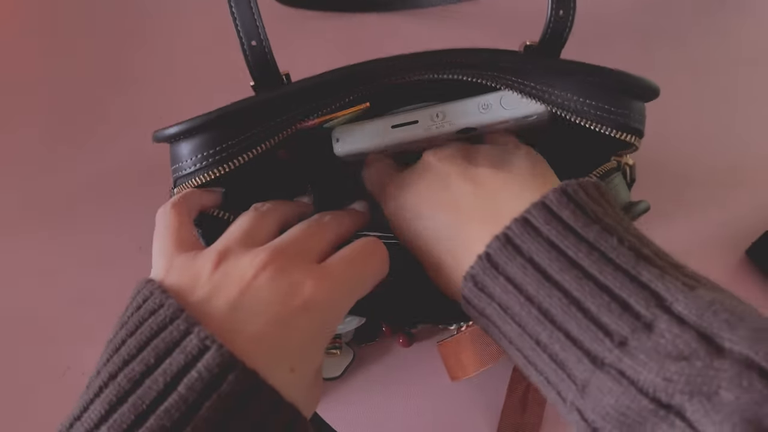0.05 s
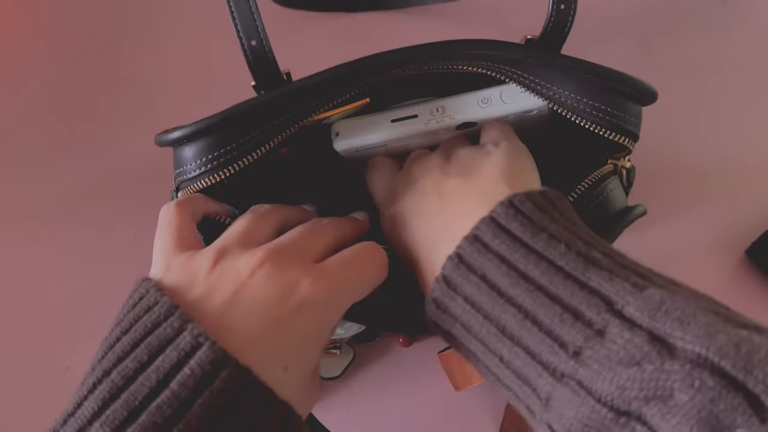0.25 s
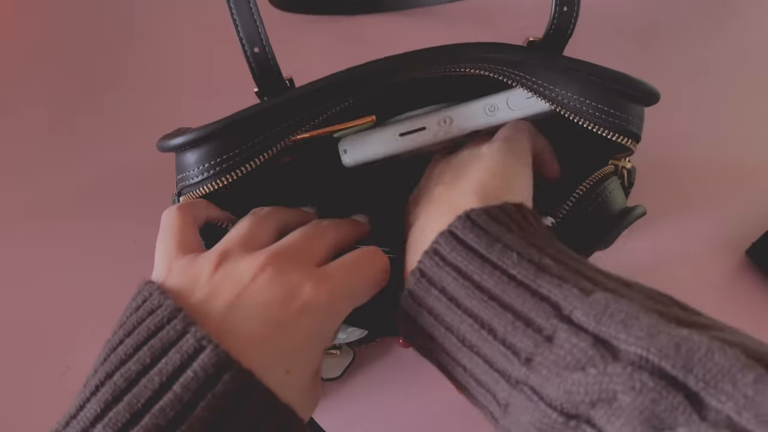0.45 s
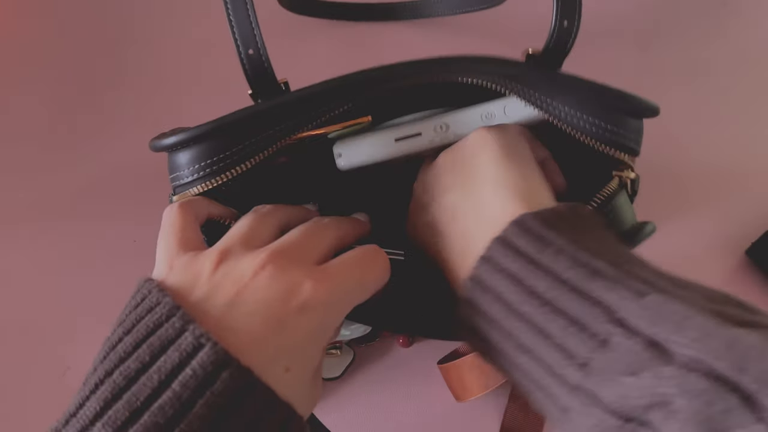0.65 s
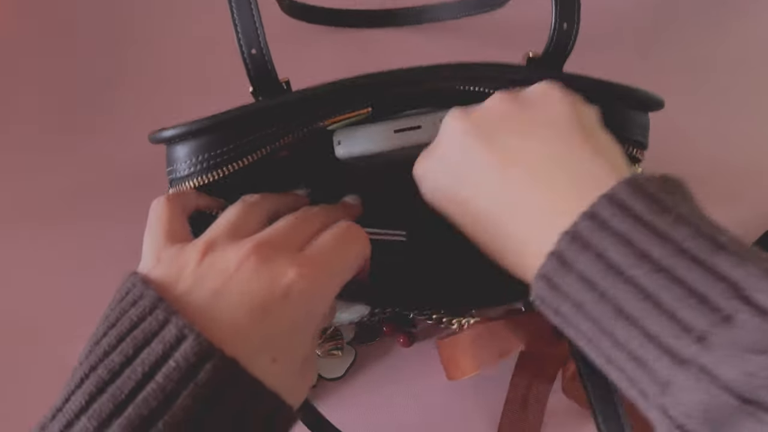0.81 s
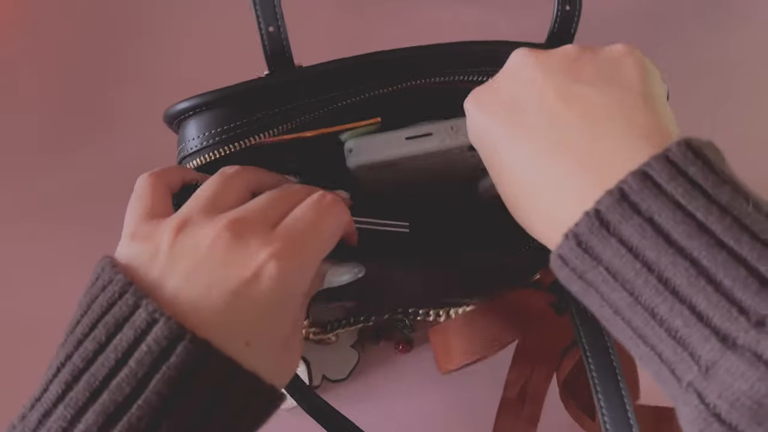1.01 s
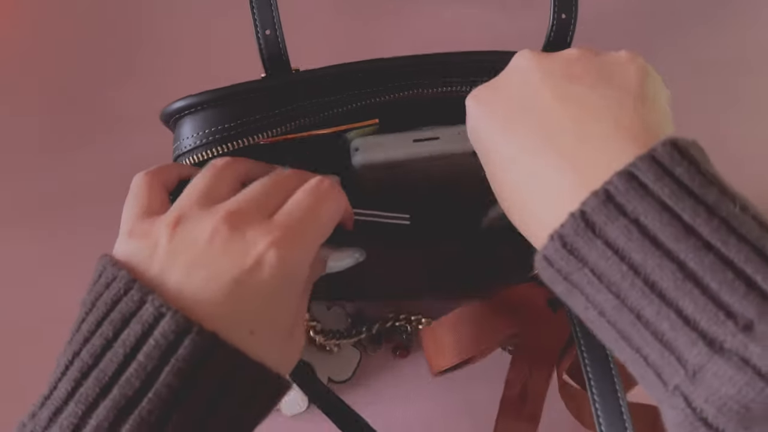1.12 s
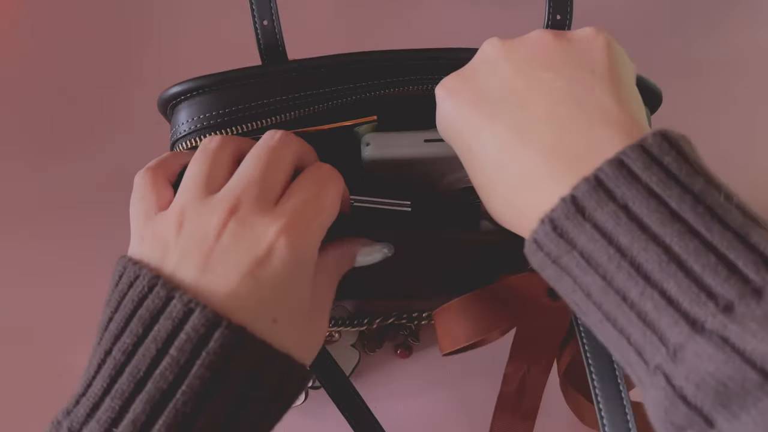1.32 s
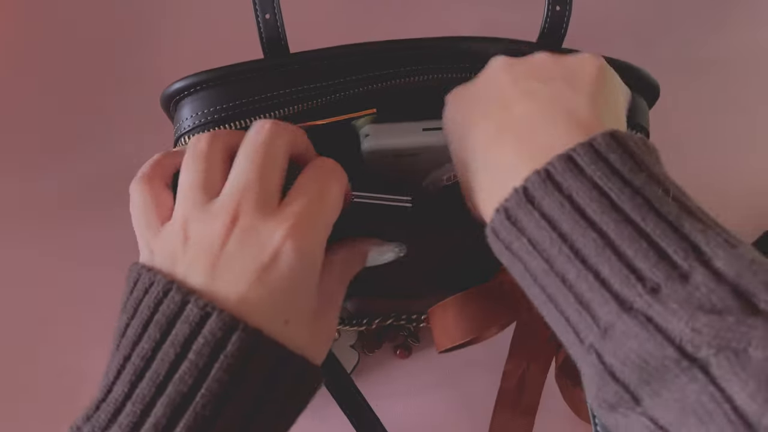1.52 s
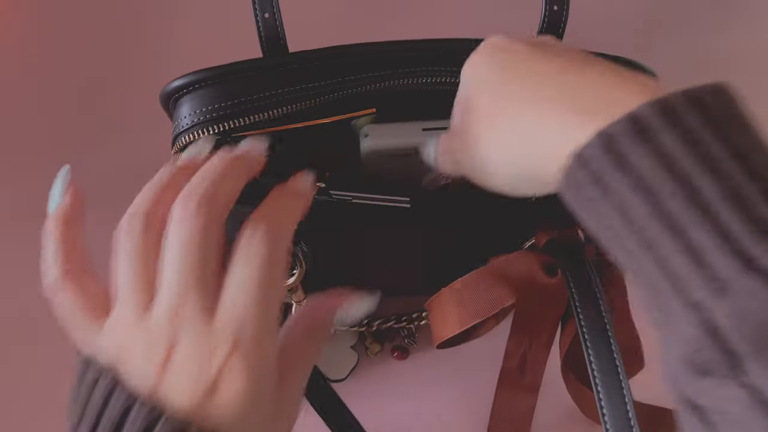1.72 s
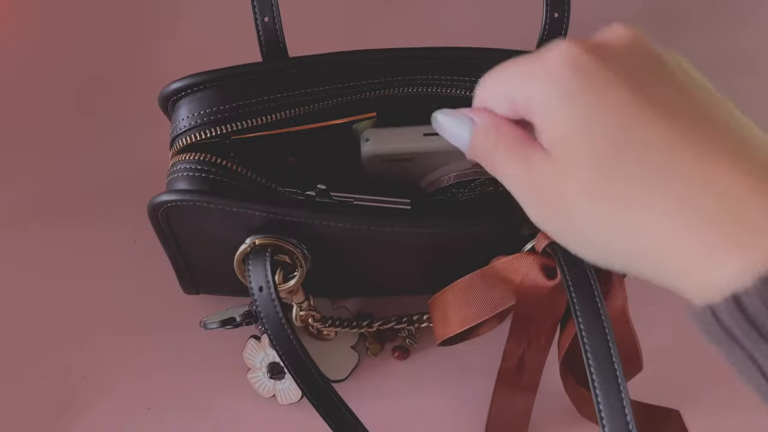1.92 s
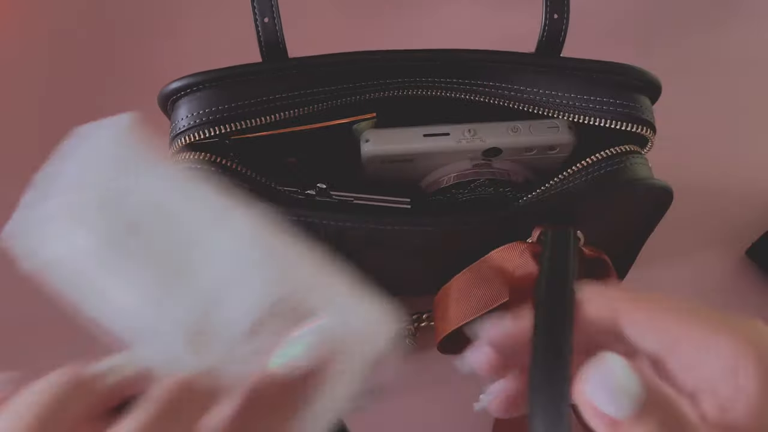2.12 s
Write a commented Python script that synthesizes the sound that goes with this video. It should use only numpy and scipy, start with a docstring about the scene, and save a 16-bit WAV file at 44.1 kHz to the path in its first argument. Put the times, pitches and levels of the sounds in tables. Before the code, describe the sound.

Leather handbag rustling and creaking as a small plastic camera knocks its way inside.

```python
"""A small plastic camera is pushed into a leather handbag, close to two microphones in a quiet, humming room.
First a knitted sleeve brushes the opening and the leather creaks in short slips; nails and zip teeth tick.
The camera's shell gives a sharp knock at 0.6 s, then scuffs and squeaks past the lining; the zip tinkles.
Just after 1 s it lands with a deep thump, slides along the leather and knocks as it settles.
The rustle dies away, leaving a faint jingle and one last tap over the hum."""
import sys
import numpy as np
from scipy import signal
from scipy.fft import rfft, irfft, next_fast_len
from scipy.io import wavfile

SR = 44100
rng = np.random.default_rng(int(sys.argv[2]) if len(sys.argv) > 2 else 0)


def materialize(psi):
    """Save the field psi as 16-bit PCM at rate SR to the path in sys.argv[1].

    A 1-D psi becomes a single channel; in a 2-D psi each row is a channel.
    """
    bounded = np.clip(np.atleast_2d(psi).T, -1, 1)
    quanta = np.round(bounded * 32767).astype(np.int16)
    wavfile.write(sys.argv[1], SR, quanta)


N = 94815

# EQ curves for the rumble, wool, leather, lining, ticks and reverb send.
# Each row: frequency in Hz, relative gain in dB.
ROOM_EQ = [(20, -19.5), (36, -21.5), (54, 5), (80, -2.5), (130, 4), (175, -7), (260, -15), (400, -20),
           (600, -30), (1000, -36.5), (2000, -50), (4000, -53), (8000, -55.5), (15000, -51)]
WOOL_EQ = [(300, 8.5), (1200, 5), (2800, 5.5), (4500, -1), (6500, 2.5), (9500, 1.5), (12000, 5), (15500, 5)]
LEATHER_EQ = [(100, -18.5), (250, -1), (420, 6), (570, -3.5), (790, -1), (1000, -5), (1280, -9),
              (1650, -12), (2700, -16), (4500, -24.5), (12000, -45.5)]
SCUFF_EQ = [(150, -30), (400, -16), (750, 3.5), (1350, 7.5), (1650, -6), (2300, 0), (2900, -11),
            (3600, -6.5), (5000, -16.5), (9500, -18), (12000, -15), (16000, -20)]
TICK_EQ = [(200, -14), (800, 9), (1800, -5), (3500, -1), (6000, 0.5), (9200, -5.5), (11500, 10), (14000, 5),
           (16500, 1.5)]
REVERB_EQ = [(60, -22.5), (160, -8), (350, 4.5), (800, 4.5), (1300, -0.5), (1800, -1), (4000, 7.5),
             (9000, 1.5), (12000, -15), (15000, -24)]
# The room's hum. Each row: pitch in Hz, level in dB.
HUM = [(59.2, -61.5), (121, -53.5)]
# Fader rides for the brushing sleeve and the rubbed leather. Each row: time in seconds, level in dB.
WOOL_FADER = [(0, -54.5), (.13, -60.5), (.18, -54.5), (.23, -55.5), (.29, -64), (.33, -66), (.36, -51.5),
              (.42, -68), (.5, -70.5), (.56, -55.5), (.62, -51), (.7, -54.5), (.79, -53), (.89, -46.5),
              (.97, -62.5), (1.07, -56.5), (1.14, -56), (1.21, -57), (1.36, -56.5), (1.41, -59), (1.5, -55),
              (1.61, -53.5), (1.65, -55), (1.7, -59), (1.75, -56), (1.81, -76), (2.03, -91.5), (2.05, -71),
              (2.12, -76)]
LEATHER_FADER = [(0, -53.5), (.09, -47.5), (.13, -54.5), (.19, -44.5), (.26, -59), (.33, -56),
                 (.365, -41.5), (.42, -59.5), (.51, -55), (.57, -52), (.625, -43), (.68, -47), (.715, -53),
                 (.75, -49.5), (.79, -58), (.87, -40.5), (.92, -47.5), (.98, -50.5), (1.05, -54.5),
                 (1.14, -46.5), (1.22, -57.5), (1.34, -47.5), (1.41, -60), (1.48, -49), (1.53, -59),
                 (1.62, -59), (1.66, -53.5), (1.76, -57), (1.87, -61.5), (2.12, -80)]
# The shell slides on leather. Each row: start, peak and end in seconds, level in dB, width factor,
# then the low, middle and high resonance in Hz, halfway through the slide.
SLIDES = [(1.224, 1.317, 1.39, -45.5, 0.93, 441.7, 1229, 2566),
          (1.633, 1.636, 1.73, -45.5, 1.9, 770, 1330, 2675)]
# Those three resonances. Each row: gain in dB, base half width in Hz.
SLIDE_RESONANCES = [(-1, 43), (-5.5, 245), (-15, 630)]
# Zip pull and chain. Each row: start in seconds, level in dB, pitch in Hz, t60 in seconds,
# rattle as phase wander in radians.
TINKLES = [(.944, -37, 14100, .075, .9), (.996, -52.5, 5470, 0.038, 1.2), (1.248, -41, 14200, 0.081, .8),
           (2.044, -50, 9300, 0.074, 2.6)]
# Nails and zip teeth. Each row: start in seconds, level in dB, gain of the very top in dB.
TICKS = [(.2080, -22, 10), (0.2097, -25, -10), (0.5776, -29, -9), (0.588, -27, -5), (0.7284, -27.5, -11),
         (0.757, -28, -7), (0.8181, -27.5, -6), (0.898, -30.5, -7), (1.138, -33.5, -3),
         (1.1693, -23.5, -13), (1.369, -37.5, 13.5), (1.703, -38, 2), (1.749, -39, 3), (2.044, -48, 3),
         (2.139, -44, -5)]
# Leather slips. Each row: start in seconds, level in dB, low, middle and high trim in dB, length factor.
CREAKS = [(.0827, -33.5, -16, -2.5, -21, 0.27), (0.0876, -33, -15, -2.5, -22, 0.52),
          (0.0958, -32, -7, -5.5, -28, 0.43), (0.1056, -25, -8, -4, -27, 0.26),
          (.152, -39, -5.5, -4.5, -16, .5), (.174, -31.5, -5, -8.5, -20, 0.84),
          (0.184, -38.5, -23, -4, -16, 0.97), (0.3231, -45.5, 5.5, -21, -25, 0.57),
          (.349, -32, -3, -13.5, -22, 1), (.356, -39, -4, -13, -20, 0.89), (.5965, -33.5, -6, -9, -24, .8),
          (.614, -29, -6, -11, -21, 2.2), (0.659, -31, 1.5, -14, -23, 1.4),
          (.669, -29.5, -3.5, -9.5, -27, 1.4), (.7, -37, -11, -7.5, -12, 1),
          (.913, -32.5, -5, -11, -19.5, 1.4), (1.124, -33.5, -6, -2.5, -20, 0.78),
          (1.133, -37, -0.5, -6, -11.5, 1.1), (1.227, -35, -3.5, -11, -23, 0.76),
          (1.456, -38.5, -6.5, -12, -22, .7), (1.635, -33, -1.5, -12, -26, 1.1),
          (1.643, -33.5, -6.5, -9, -19.5, 0.81), (1.651, -36.5, -15, -6.5, -16, 1.2),
          (1.704, -41, -15, -5, -13, 1.2), (1.72, -36.5, -5, -9.5, -11.5, 1.06),
          (1.835, -47.5, -4, -7.5, -24.5, 1.4)]
# The leather's resonances. Each row: lower and upper edge in Hz, gain in dB, base decay in seconds.
CREAK_BANDS = [(770, 1760, -1, 0.0029), (2090, 3430, 5, 0.0019), (4300, 11500, 6.5, 0.0027)]
# Plastic on lining. Each row: start and length in seconds, first and last pitch in Hz, level in dB.
SQUEAKS = [(.836, 0.0275, 1150, 1390, -24.5), (.824, 0.024, 680, 800, -29),
           (.822, 0.016, 2420, 2300, -37.5), (.828, 0.016, 2150, 1400, -40.5), (.848, 0.027, 322, 360, -28),
           (.878, 0.029, 350, 428, -39), (.902, 0.048, 430, 530, -40)]
# Bumps on the bag's wall. Each row: start in seconds, level in dB, pitch in Hz.
WALL_BUMPS = [(.352, -30.5, 436), (.376, -30, 315), (.595, -25.5, 445), (.606, -39, 400), (0.62, -28, 300),
              (.637, -29, 250), (0.656, -31, 380), (1.009, -30, 296), (1.082, -21.5, 271),
              (1.132, -23, 462), (1.155, -33.5, 397), (1.180, -38, 399.4), (1.560, -29, 322),
              (1.5605, -35.5, 520), (.802, -35, 397), (1.782, -36, 327), (2.141, -33, 390)]
# The bag meets the table. Each row: start in seconds, level in dB, contact hardness as a cutoff in Hz.
THUMPS = [(0.377, -25.5, 60.3), (1.083, -11, 262), (1.148, -19.5, 200), (1.528, -24.5, 69.6),
          (1.827, -32, 91)]
# The whole bag's modes. Each row: pitch in Hz, gain in dB, t60 and rise in seconds.
BAG_MODES = [(70, -3, 0.23, 0.018), (122.8, 1, .14, 0.0063), (187.5, -14, 0.16, 0.014),
             (275, -15.5, .15, 0.0045)]
# Hits on the camera. Each row: start in seconds, level in dB, hardness as a cutoff in Hz, pitch factor.
KNOCKS = [(.088, -25.5, 600, 1.16), (.152, -27, 650, 0.89), (.2092, -26.5, 1400, 1.05),
          (.536, -34.5, 1200, 1.15), (0.5594, -26.5, 900, 1.02), (.5893, -9.5, 560, 0.96),
          (.600, -28, 650, 0.92), (.801, -34, 1000, 1.16), (1.078, -18, 704, 0.96),
          (1.1701, -20, 3160, 1.042), (1.557, -29, 700, 1.11), (1.781, -40, 900, 1.22),
          (2.1395, -26.5, 1080, 1.06)]
# Its plastic shell's modes. Each row: base pitch in Hz, gain in dB, t60 in seconds.
SHELL_MODES = [(748, -5, 0.027), (945, -6.5, 0.013), (1270, -0.5, 0.0076), (1514, -35, 0.015),
               (1950, -17, 0.028), (2620, -12.5, 0.019), (3350, -5, 0.0092), (4270, -21, 0.01)]
# Phase between the microphone ports. Each row: frequency in Hz, lead of the left side in radians.
PORT_PHASE = [(0, 0), (4500, .1), (6000, -.2), (8000, -1.5), (9500, -2.1), (11200, -3.0), (13000, -3.2),
              (15000, -4.1), (17000, -3.7)]


def amp(db):
    """Decibels to gain."""
    return 10 ** (np.asarray(db) / 20)


def unit_rms(x):
    """Scale to unit rms."""
    return x / np.sqrt(np.mean(x ** 2) + 1e-20)


def since(start):
    """Seconds since a moment, zero before it."""
    return np.maximum(np.arange(N) / SR - start, 0)


def fader(points):
    """Gain over time through (seconds, dB) points."""
    return amp(np.interp(since(0), *np.transpose(points)))


def drift(rate_hz):
    """Smooth random wobble of unit rms."""
    pole = np.exp(-2 * np.pi * rate_hz / SR)
    return unit_rms(signal.lfilter([1], [1, -2 * pole, pole * pole], rng.standard_normal(N + SR))[SR:])


def filtered(x, hz, kind):
    """Gentle low-, high- or band-pass."""
    return signal.sosfilt(signal.butter(2, hz, kind, fs=SR, output="sos"), x)


def eq(x, curve, keep_power=True):
    """Minimum-phase EQ; with keep_power, white noise comes out equally strong."""
    size = next_fast_len(2 * N)
    hz, db = np.transpose(curve)
    gain = amp(np.interp(np.log(np.arange(size // 2 + 1) * SR / size + 1), np.log(hz), db))
    cepstrum = irfft(np.log(unit_rms(gain) if keep_power else gain), size)
    cepstrum[1:size // 2] *= 2   # folded forward, so nothing rings ahead of a hit
    cepstrum[size // 2 + 1:] = 0
    return irfft(rfft(x, size) * np.exp(rfft(cepstrum)), size)[..., :N]


def burst(start, decay, rise=0.00029):
    """Fast attack, exponential decay."""
    t = since(start)
    return (1 - np.exp(-t / rise)) * np.exp(-t / decay)


def ring(start, hz, t60, rise=0.00022):
    """One struck resonance."""
    return burst(start, t60 / np.log(1000), rise) * np.sin(2 * np.pi * hz * since(start))


def softened(hz, hardness_hz):
    """A soft contact hardly drives the higher modes."""
    return 1 / np.sqrt(1 + (hz / hardness_hz) ** 4)


def friction(rough_db, grains_per_s, grain_share):
    """Fine hiss and separate catches under an unsteady pressure."""
    grains = (rng.random(N) < grains_per_s / SR) * rng.standard_normal(N)
    texture = np.sqrt(1 - grain_share) * rng.standard_normal(N) + np.sqrt(grain_share) * unit_rms(grains)
    return unit_rms(texture * amp(rough_db * drift(75)))


def room_tone():
    """The bed: low rumble with a wavering hum."""
    rumble = amp(-44) * eq(rng.standard_normal(N), ROOM_EQ)
    hum = sum(amp(db) * np.sqrt(2) * np.sin(2 * np.pi * hz * since(0) + 1.04 * drift(6.1))
              for hz, db in HUM)
    return rumble + hum


def rustle():
    """Wool hisses on the opening while camera and fingers rub a darker tone from the leather."""
    wool = friction(rough_db=2, grains_per_s=450, grain_share=0.27) * fader(WOOL_FADER)
    leather = friction(rough_db=3, grains_per_s=700, grain_share=0.3) * fader(LEATHER_FADER)
    return eq(wool, WOOL_EQ) + eq(leather, LEATHER_EQ)


def shell_slides():
    """Fine friction sings in three hollow resonances that sink as the camera goes deeper."""
    t, out = since(0), 0
    sag_octaves_per_s = 1.5
    for start, peak, end, db, width, *pitches in SLIDES:
        pressure = np.sqrt(np.interp(t, [start, peak, end], [0, 1, 0]))
        sag = 2 ** (-sag_octaves_per_s * (np.clip(t, start, end) - (start + end) / 2))
        for hz, (gain_db, width_hz) in zip(pitches, SLIDE_RESONANCES):
            phase = 2 * np.pi * np.cumsum(hz * sag) / SR
            band = drift(width * width_hz) * np.cos(phase) + drift(width * width_hz) * np.sin(phase)
            out += amp(db + gain_db) * pressure * band
    return out


def zip_tinkles():
    """Tiny metal parts ring: a thin ping when free, a rough jingle when they rattle."""
    out = 0
    for start, db, hz, t60, rattle in TINKLES:
        tone = np.sin(2 * np.pi * hz * since(start) + rattle * drift(320))
        out += amp(db) * burst(start, t60 / np.log(1000)) * tone
    return out


def nail_and_zip_ticks():
    """Hard, bright ticks with a faint tail; the sharpest contacts have the most top."""
    noise = rng.choice([-1, 1], N)
    body, top, crossover_hz = 0, 0, 11800
    for start, db, top_db in TICKS:
        tick = amp(db) * noise * (burst(start, decay=0.0013) + amp(-39) * burst(start, decay=0.0086))
        body += tick
        top += amp(top_db) * tick
    return eq(filtered(body, crossover_hz, "low") - filtered(top, crossover_hz, "high"), TICK_EQ)


def leather_creaks():
    """Each slip is a short tick or a longer crackle in three broad resonances."""
    out = 0
    for band, (low, high, gain_db, decay) in enumerate(CREAK_BANDS):
        force = sum(amp(db + trims[band] + gain_db) * burst(start, decay * length, rise=0.0007 * length)
                    for start, db, *trims, length in CREAKS)
        makeup_gain = np.sqrt(SR / 2 / (high - low))
        out += makeup_gain * filtered(force * rng.choice([-1, 1], N), [low, high], "band")
    return out


def lining_scuff():
    """Plastic drags on the lining in one quick swell of rough friction."""
    t = since(0)
    start, peak, end = 0.825, 0.853, 0.869
    swell = fader([(start, -35.5), (peak, -29), (end, -35.5)]) * (t > start) * (t < end)
    return eq(friction(rough_db=1, grains_per_s=3000, grain_share=0.5) * swell, SCUFF_EQ)


def lining_squeaks():
    """Plastic squeaks past the lining in short, jittery glides, most of them upward."""
    out = 0
    for start, length, first_hz, last_hz, db in SQUEAKS:
        progress = np.minimum(since(start) / length, 1)
        glide = first_hz + (last_hz - first_hz) * np.sin(np.pi / 2 * progress)
        hz = glide * (1 + 0.025 * drift(194))
        out += amp(db) * np.sin(np.pi * progress) * np.sin(2 * np.pi * np.cumsum(hz) / SR)
    return out


def bag_thumps():
    """Dull bumps of the wall and deep thumps of the whole bag on the table."""
    bumps = sum(amp(db) * ring(start, hz, t60=0.029, rise=0.00069) for start, db, hz in WALL_BUMPS)
    thumps = sum(amp(db + mode_db) * softened(hz, hardness) * ring(start, hz, t60, rise)
                 for start, db, hardness in THUMPS for hz, mode_db, t60, rise in BAG_MODES)
    return bumps + thumps


def camera_knocks():
    """The plastic shell rings briefly, damped by the hand; its modes alternate in polarity."""
    return sum((-1) ** k * amp(db + mode_db) * softened(hz, hardness) * ring(start, hz * pitch, t60)
               for start, db, hardness, pitch in KNOCKS
               for k, (hz, mode_db, t60) in enumerate(SHELL_MODES))


def room_reverb(send):
    """A short diffuse tail, different on each side; its treble dies first."""
    tail = 0
    for kind, t60 in (("low", 0.23), ("high", 0.068)):
        noise = filtered(rng.standard_normal((2, N)), 2000, kind)
        tail += noise * unit_rms(burst(0.001, t60 / np.log(1000))) / np.sqrt(N)
    shaped = eq(send, REVERB_EQ, keep_power=False)
    return amp(-10.5) * signal.fftconvolve(shaped[None], tail, axes=1)[:, :N]


def microphone_pair(x):
    """Stereo width: the two microphone ports hear the treble out of step."""
    size = next_fast_len(2 * N)
    lead = np.interp(np.arange(size // 2 + 1) * SR / size, *np.transpose(PORT_PHASE))
    return irfft(rfft(x, size) * np.exp(.5j * np.outer([1, -1], lead)), size)[:, :N]


def scene():
    """The mix: room bed, handling textures and camera hits, close up with a little reverb."""
    mix = room_tone() + rustle() + shell_slides() + zip_tinkles() + leather_creaks()
    mix += lining_scuff() + lining_squeaks() + bag_thumps() + camera_knocks()
    ticks = nail_and_zip_ticks()
    send = mix + amp(-4) * ticks   # the ticks are close and send less into the room
    return microphone_pair(mix + ticks) + room_reverb(send)


def record(dry):
    """A steep high cut at 16.3 kHz on the master."""
    return signal.sosfilt(signal.ellip(10, .2, 80, 16300, fs=SR, output="sos"), dry)


dry = scene()
out = record(dry)
materialize(out)
```